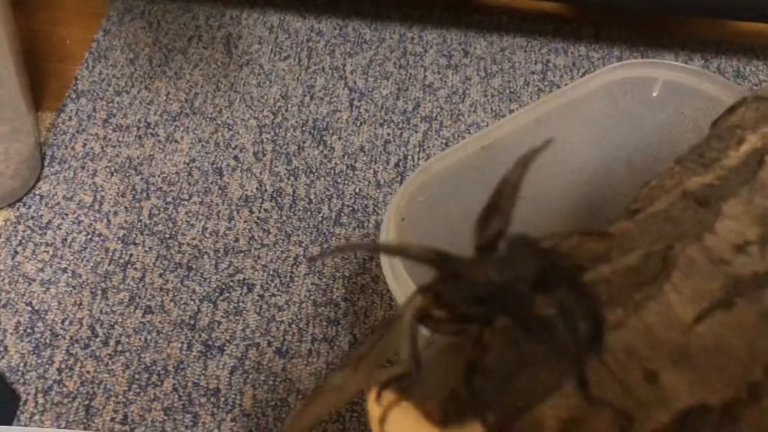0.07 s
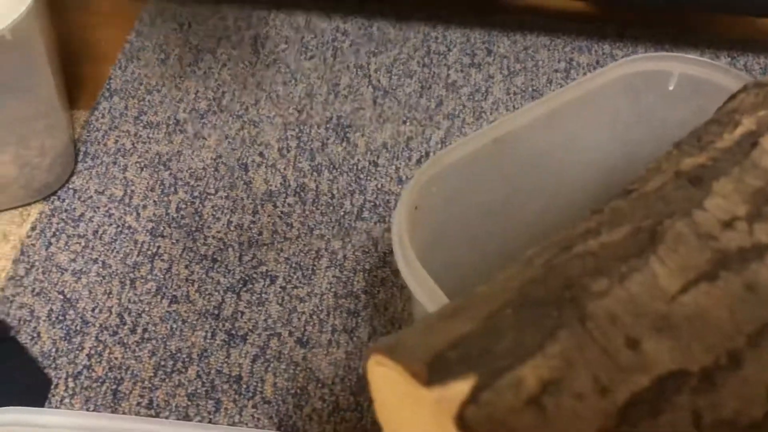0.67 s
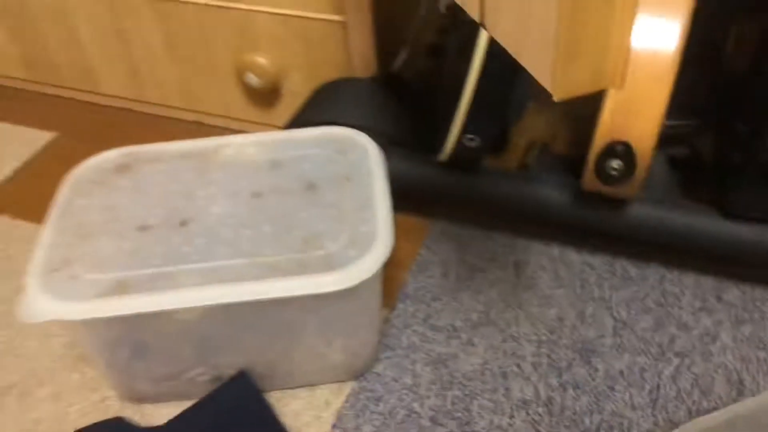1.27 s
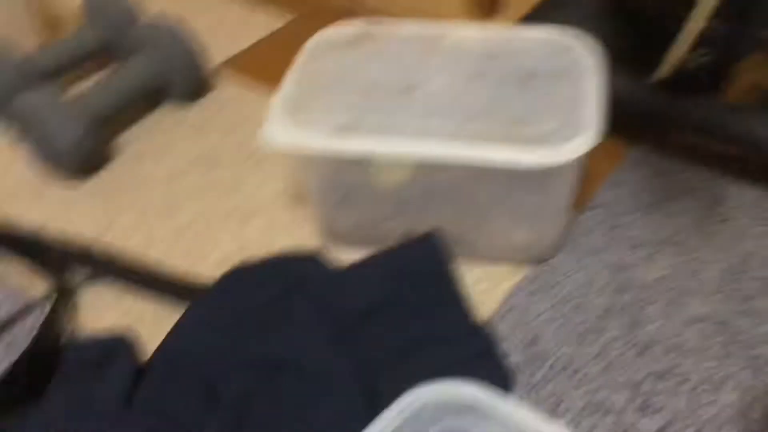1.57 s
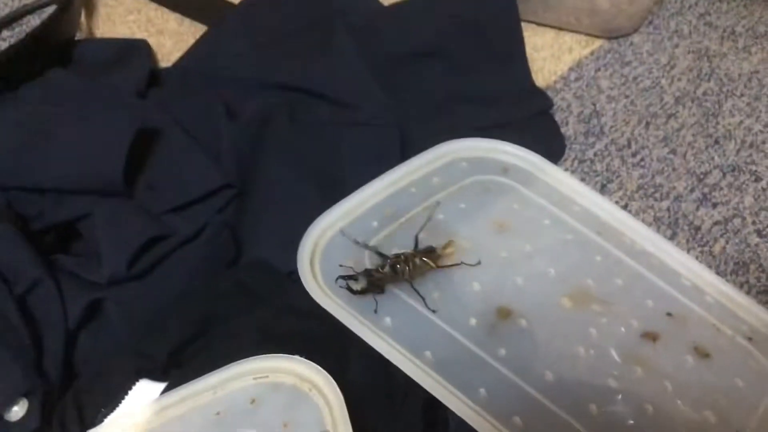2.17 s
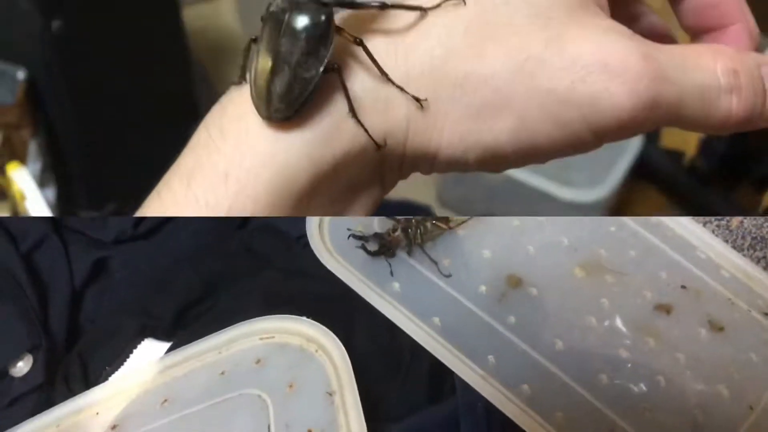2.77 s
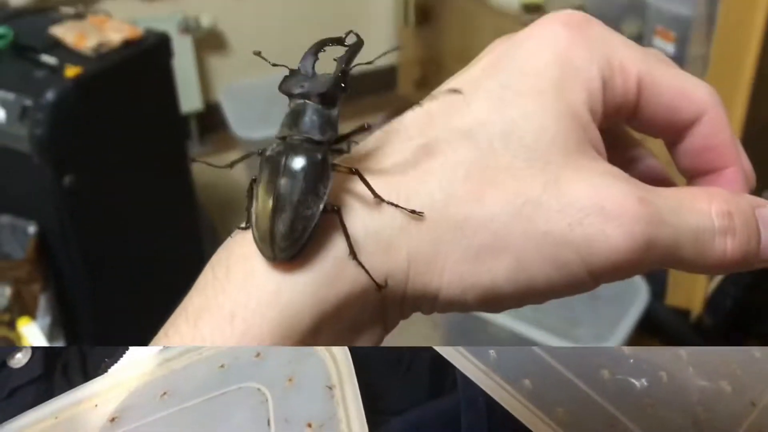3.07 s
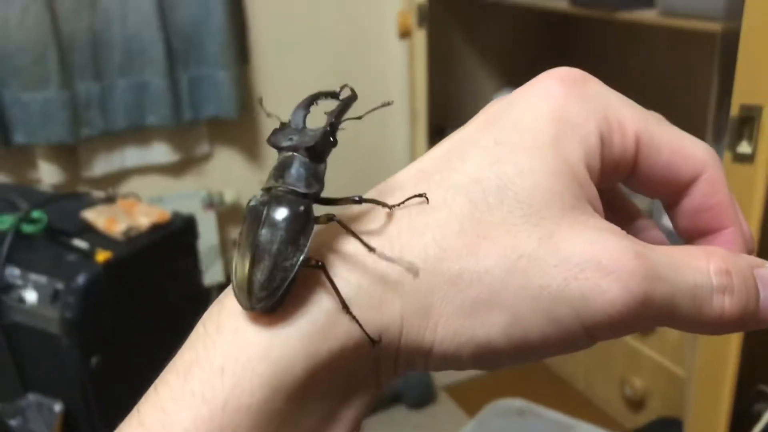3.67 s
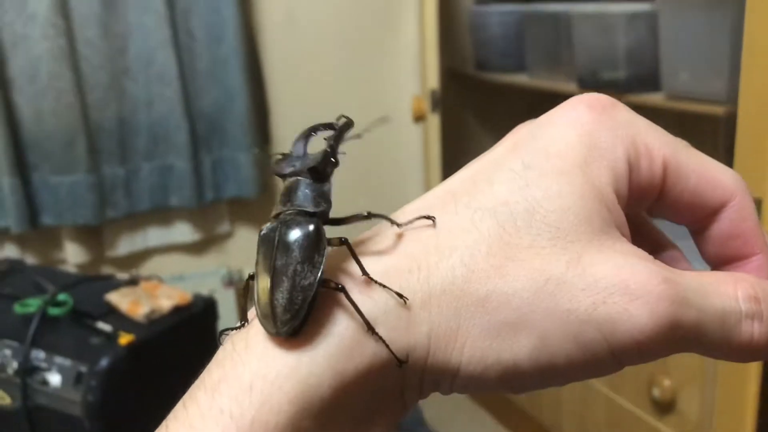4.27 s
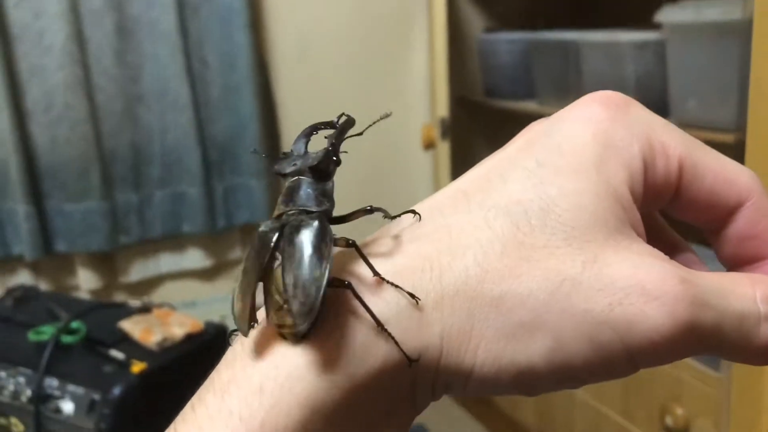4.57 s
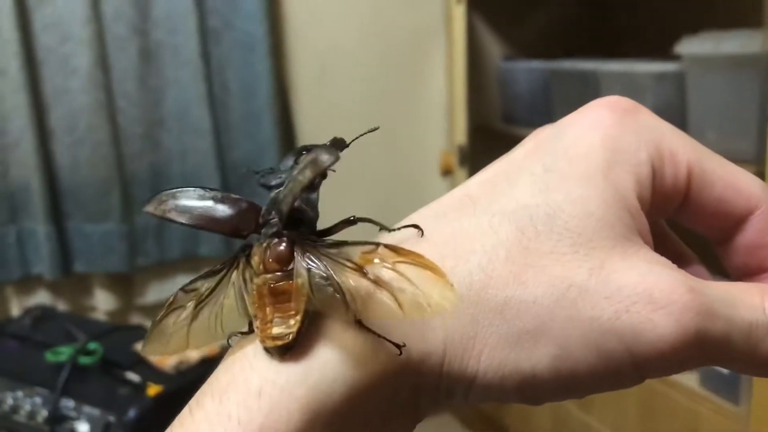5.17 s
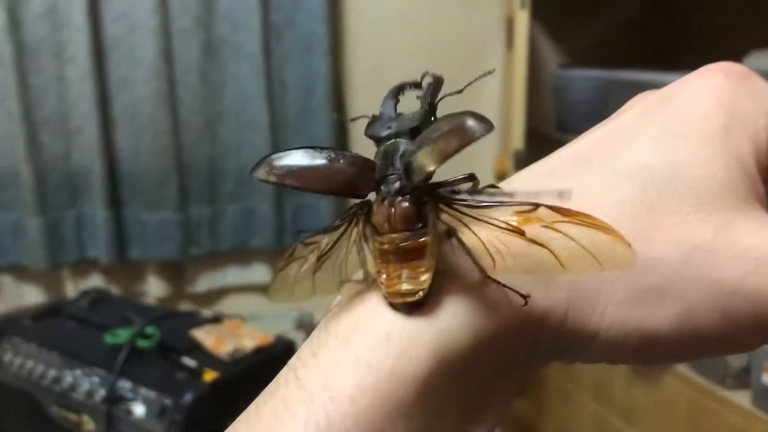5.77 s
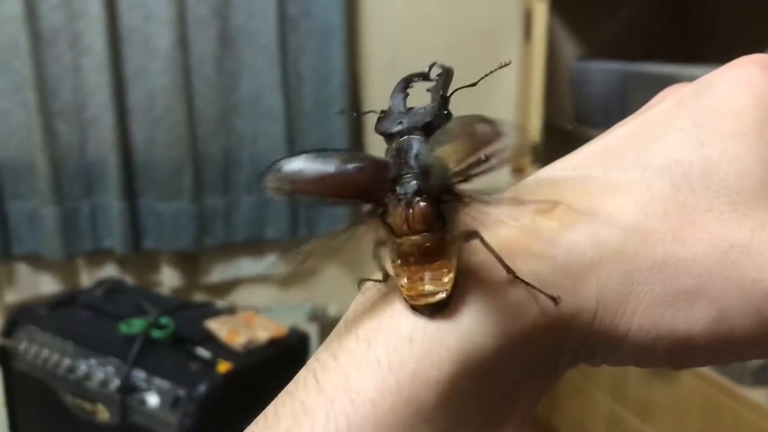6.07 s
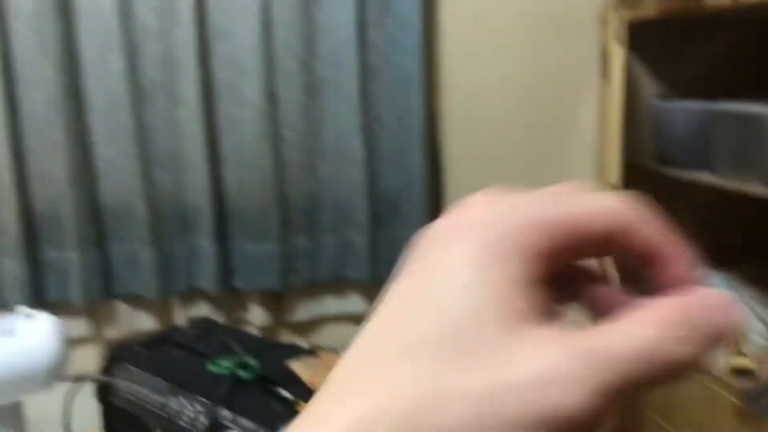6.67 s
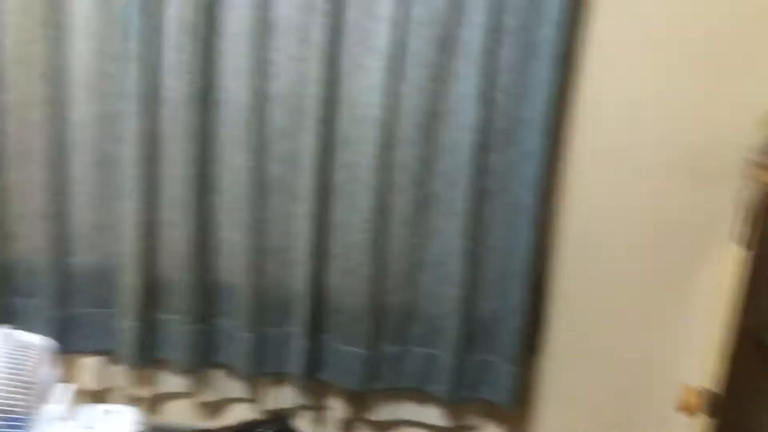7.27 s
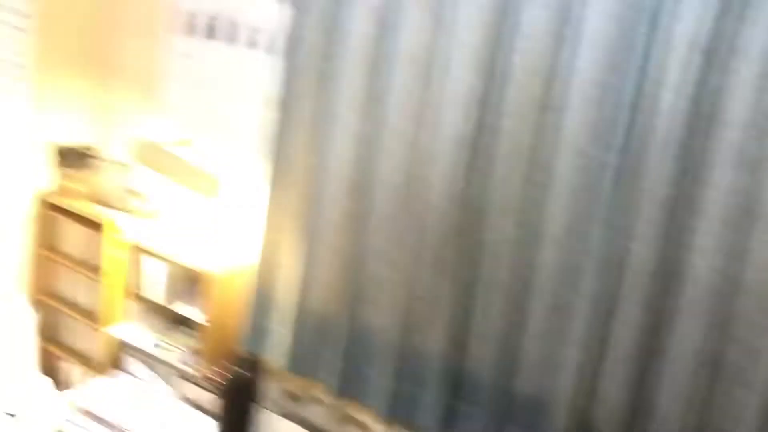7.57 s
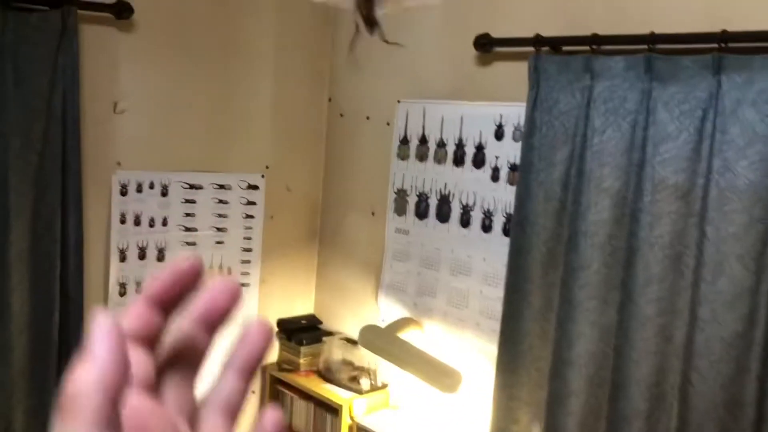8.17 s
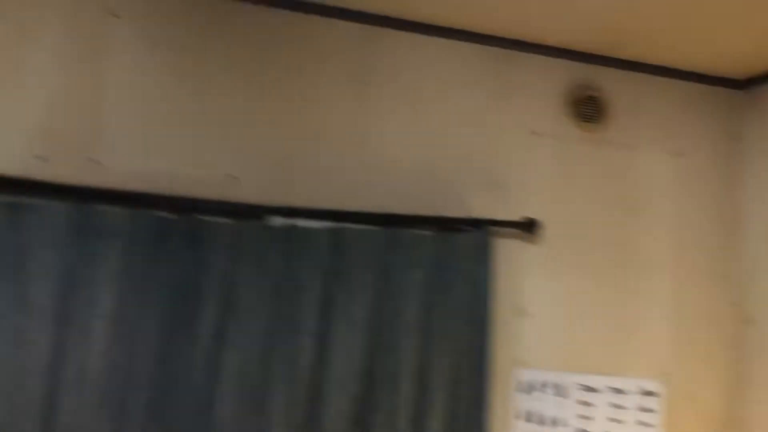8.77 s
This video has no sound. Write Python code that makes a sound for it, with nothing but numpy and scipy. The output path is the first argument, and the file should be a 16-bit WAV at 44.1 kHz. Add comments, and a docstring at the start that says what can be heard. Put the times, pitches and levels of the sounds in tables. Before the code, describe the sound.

A large beetle buzzes past and crashes onto a plastic tub; after a quiet pause, a second beetle flutters around the small room.

```python
"""Two stag beetles fly in a small quiet room. Each wingbeat is a low hum with two papery snaps, one a
stroke, plus churned air, hiss and downwash. The first beetle buzzes past the microphone, bumps into
something close and crashes onto a plastic tub, which rings as it bounces. The second clicks its wing
cases open, slides out its hind wings, leaves a hand and circles the room. Behind them: the handler's
rustling cloth, still air and a faint mains hum."""
import sys
import numpy as np
from scipy import signal
from scipy.fft import rfft, irfft, next_fast_len
from scipy.io import wavfile
from scipy.ndimage import uniform_filter1d, minimum_filter1d

SR = 44100
rng = np.random.default_rng(int(sys.argv[2]) if len(sys.argv) > 2 else 0)


def pcm_store(signal):
    """Save signal as 16-bit PCM."""
    levels = np.round(np.clip(np.atleast_2d(signal), -1, 1) * 32767)
    wavfile.write(sys.argv[1], SR, levels.astype(np.int16).T)


N = 388521
T = np.arange(N) / SR
NEAR_DB = -45  # reference nearness

# spectral shapes: (frequency [Hz], relative density [dB])
ROOM_AIR_SPECTRUM = [(15, -42), (25, -12.5), (49, -5.5), (70, -14.5), (82, -4), (102, -0.5), (123, -6),
                     (301, -9), (476, -13.5), (695, -17), (2160, -26.5), (8360, -30.5), (16000, -35.5)]
CLOTH_SPECTRUM = [(100, -10.5), (400, 4), (1200, 0.5), (2500, 0), (5000, -1), (9000, -11), (16000, -13)]
UNFOLD_SPECTRUM = [(500, -7), (1500, -4.5), (5000, -8.5), (9000, 0.5), (16000, -1.5)]
SHELL_SPECTRUM = [(200, -28), (900, -5), (2500, -4.5), (3800, -2), (6000, -0.5), (9500, -5.5), (12000, -6),
                  (16000, -9)]
BLOW_SPECTRUM = [(40, -58.5), (100, -39), (140, -13.5), (190, -7), (250, -11), (420, 1.5), (650, 1),
                 (820, 1.5), (1150, -3.5), (1400, -9), (2000, -4.5), (2700, -15.5), (4000, -16),
                 (8000, -16.5), (16000, -36.5)]
DOWNWASH_SPECTRUM = [(22, -35), (45, -5), (110, -2.5), (200, 2), (280, -4), (400, -17.5), (800, -36),
                     (2000, -47)]
CHURN_SPECTRUM = [(30, -20), (100, -9.5), (250, -2.5), (380, -4), (500, 1), (680, -4.5), (900, -3.5),
                  (1200, -6.5), (2000, -16.5), (4000, -38.5)]
HISS_SPECTRUM = [(600, -20), (1400, 0), (2500, -4.5), (4000, -7), (7000, -9.5), (11000, -14),
                 (16000, -14.5)]
SNAP_SPECTRUM = [(500, -31), (1200, 3.5), (2200, 2), (4000, -0.5), (7000, -3.5), (10000, -4), (13000, -7.5),
                 (16000, -11.5)]

# room decay: (frequency [Hz], t60 [s])
ROOM_DECAY = [(80, 0.75), (250, 0.47), (1000, 0.2), (4000, 0.33), (9000, 0.27), (16000, 0.26)]
# mains hum: (frequency [Hz], level [dB])
MAINS_TONES = [(99.7, -77), (199.5, -82)]
# handler's movements: (centre [s], half length [s], level [dB])
CLOTH_MOVES = [(0.01, 0.16, -66.5), (1.0, 0.068, -86), (1.351, 0.28, -69), (1.838, 0.088, -73),
               (2.103, .07, -75.5), (2.39, 0.093, -75), (2.68, .1, -80.5), (6.645, 0.025, -56),
               (6.927, 0.19, -68.5), (7.448, 0.11, -62), (7.913, 0.11, -63.5)]
# light tap on something hard: (time [s], level [dB], frequency [Hz], t60 [s])
TAPS = [(6.913, -47, 3210, 0.027)]
# claws, wing cases, wing tips: (time [s], level [dB], tilt [dB/octave], resonance [Hz])
SHELL_CLICKS = [(0.893, -25.5, -1.5, 5470), (1.124, -50, 4, 7200), (1.168, -15, -.5, 3940),
                (1.2696, -33, -1.5, 6300), (1.4129, -40, -1.5, 6140), (1.987, -56, -1, 9000),
                (2.036, -55.5, -1, 8100), (2.428, -60.5, -4.5, 8830), (3.577, -62.5, 5, 9540),
                (4.32, -42.5, 5.5, 9100), (4.56, -48, 5.5, 9230), (6.1188, -40, 6, 10500),
                (6.2755, -45, 2, 2500), (6.332, -43, -5.5, 2400), (6.9154, -49.5, 2, 3250),
                (7.6403, -46, -5, 5500), (7.696, -41.5, 4, 6960)]
# wings and legs on bark, plastic or skin: (time [s], level [dB], decay [s], tilt [dB/octave])
SHELL_SCRAPES = [(0.252, -56, 0.0052, -3.5), (0.39, -39, 0.0044, 0.5), (0.398, -37, 0.0026, -2.5),
                 (0.4177, -30, 0.0026, 3), (0.8813, -29, 0.0028, -2.5), (0.9025, -26, .0021, -0.5),
                 (0.94, -39, 0.0055, -4.5), (0.9755, -42, .005, 3), (1.017, -49.5, .003, 6),
                 (1.036, -49.5, .004, -0.5), (1.155, -36.5, 0.0032, -0.5), (1.161, -32.5, 0.0027, 1),
                 (2.122, -57, 0.0016, -6.5), (4.668, -58, 0.0045, -6), (6.086, -38.5, .0025, -5)]
# blows on plastic: (time [s], level [dB], treble shelf [dB])
BLOWS = [(0.886, -20, -31), (0.911, -33.5, -9), (1.1637, -32.5, -11), (1.168, -16.5, -6.5),
         (1.227, -40.5, 0), (1.263, -32.5, 4.5), (1.412, -52.5, -8), (1.433, -38, -2), (1.486, -45.5, -19),
         (1.521, -55, -22.5), (1.579, -58.5, -22), (2.603, -56.5, -10.5), (3.204, -58, -13)]
# tub modes: (frequency [Hz], relative level [dB], t60 [s])
TUB_RING = [(184, -6, 0.33), (413, -12, 0.067), (497, -9, 0.19), (645, -10, .12), (770, -7, .12),
            (1000, -3.5, .1), (1055, -9, 0.17), (1650, -13, .08), (1840, -13, 0.034)]

# a row per flight: (lift-off [s], first full downstroke [s], end [s])
FLIGHT_TIMES = [(0.396, 0.42, 1.0), (6.085, 6.111, 9)]
# pass over the microphone, a row per flight: (time [s], approach [s], extra downwash [dB])
PASSES = [(0.91, .03, 14), (6.37, 0.16, 5.5)]
# wingbeat, a curve per flight: (time [s], rate [Hz])
BEAT_RATES = [
    [(0.48, 36.71), (0.54, 36.3), (0.63, 35.0), (0.8, 35.57)],
    [(6.2, 36.11), (6.37, 35.43), (6.59, 36.02), (6.9, 34.92), (7.13, 34.55), (7.67, 35.61), (7.98, 34.15),
     (8.16, 34.98)],
]
# path, a curve per flight: (time [s], nearness as hum level [dB], downstroke facing the microphone [dB])
FLIGHT_PATHS = [
    [(0.41, -44.5, 3), (0.56, -44, 6.5), (0.62, -40, -4), (0.7, -40.5, -7), (0.82, -34.5, -4.5),
     (0.875, -27.5, -1), (0.95, -43.5, 6), (0.99, -86, 14)],
    [(6.09, -45, -10.5), (6.17, -44.5, -0.5), (6.28, -47, 6), (6.46, -47, 3.5), (6.6, -49, 1.5),
     (6.82, -60, -16), (7.1, -57, -3), (7.28, -61, 5.5), (7.43, -61.5, 3), (7.56, -48.5, 3),
     (7.68, -49.5, 6.5), (7.87, -59, 8), (8.02, -56, 5.5), (8.15, -56.5, -1.5), (8.32, -57, 11.5),
     (8.43, -52, -0.5), (8.81, -55.5, 4.5)],
]
# hum, a table per flight: (wingbeat multiple, relative level [dB])
HUM_PARTIALS = [
    [(1, -21.5), (2, -4.5), (3, -10.5), (4, 1.5), (5, -8), (6, -7), (7, -11.5), (8, -21), (9, -16.5),
     (10, -18.5), (11, -23), (12, -19.5)],
    [(1, -16), (2, 2), (3, -5.5), (4, 0), (5, -8.5), (6, -5), (7, -8.5), (8, -16.5), (9, -33), (10, -22),
     (11, -21), (12, -23)],
]
# brief fades of the hum: (centre [s], half length [s], gain [dB])
HUM_FADES = [(7.298, .08, -3), (8.175, 0.086, -8)]


def amp(db):
    """Decibels to gain."""
    return 10 ** (np.asarray(db) / 20)


def unit_rms(x):
    """Scales to rms 1."""
    return x / np.sqrt(np.mean(x ** 2) + 1e-20)


def unit_peak(x):
    """Scales the loudest 2 ms to rms 1."""
    return x / np.sqrt(uniform_filter1d(np.pad(x, 88) ** 2, 88).max())


def at_hz(points, hz):
    """Interpolates a table over log frequency."""
    points_hz, values = np.transpose(points)
    return np.interp(np.log(hz + 1), np.log(points_hz + 1), values)


def curves(rows):
    """Interpolates each column over time."""
    times_s, *columns = np.transpose(rows)
    return [np.interp(T, times_s, column) for column in columns]


def swell(centre_s, half_s):
    """Gaussian bump of height 1."""
    return np.exp(-((T - centre_s) / half_s) ** 2)


def wander(rate_hz):
    """Random drift, rate_hz new values a second."""
    return np.interp(T * rate_hz, np.arange(4000), rng.standard_normal(4000))


def noise(spectrum):
    """Shaped noise of rms 1."""
    size = next_fast_len(N)
    gain = amp(at_hz(spectrum, np.fft.rfftfreq(size, 1 / SR)))
    return unit_rms(irfft(rfft(rng.standard_normal(size)) * gain, size)[:N])


def minimum_phase(gain_db):
    """Frequency response with a sharp onset for a gain curve."""
    log_gain = np.log(amp(np.r_[gain_db, gain_db[-2:0:-1]]))
    return np.exp(np.conj(signal.hilbert(log_gain)))[:len(gain_db)]


def add(mix, start_s, sound):
    """Mixes a sound in at start_s."""
    part = mix[round(start_s * SR):][:len(sound)]
    part += sound[:len(part)]


def background(air_db=-68.5, dip_db=-3.5):
    """Still room air and mains hum; the level dips once, briefly."""
    mains = 0
    for hz, db in MAINS_TONES:
        gain = amp(db + wander(3.1)) * np.sqrt(2)
        mains += gain * np.sin(2 * np.pi * hz * T + 0.33 * wander(1.5))
    return amp(dip_db * swell(2.92, .24)) * (amp(air_db) * noise(ROOM_AIR_SPECTRUM) + mains)


def room(x, slot_samples=20, count=1100):
    """Dense reflections off near walls; each band decays at its own rate."""
    echoes = np.zeros(SR)
    signs = rng.choice([-1., 1.], count)
    echoes[np.arange(count) * slot_samples + rng.integers(0, slot_samples, count) + SR // 300] = signs
    hz, t, bands = signal.stft(echoes, SR, nperseg=256)
    early = 1 + 2.4 * np.exp(-t / .015)
    decay = amp(-60 * t / at_hz(ROOM_DECAY, hz)[:, None])
    tail = signal.istft(bands * early * decay, SR, nperseg=256)[1]
    return signal.oaconvolve(x, tail / np.linalg.norm(tail))[:N]


def cloth(grain_db=3):
    """Cloth rubs in soft clumps, one swell a movement."""
    moves = sum(amp(db) * swell(centre_s, half_s) for centre_s, half_s, db in CLOTH_MOVES)
    return moves * amp(grain_db * wander(150)) * noise(CLOTH_SPECTRUM)


def taps():
    """A tap rings one short mode."""
    out, t = np.zeros(N), np.arange(SR // 4) / SR
    for start_s, db, hz, t60_s in TAPS:
        add(out, start_s, amp(db - 60 * t / t60_s) * np.sin(2 * np.pi * hz * t))
    return out


def unfolding(start_s=4.565, lock_s=4.68, release_s=.008, first_db=-76.5, last_db=-60):
    """Hind wings slide open; the hiss grows until they lock."""
    gate = (T > start_s) * np.exp(-np.maximum(T - lock_s, 0) / release_s)
    level_db = np.interp(T, [start_s, lock_s], [first_db, last_db]) + 2 * wander(390)
    return gate * amp(level_db) * noise(UNFOLD_SPECTRUM)


def shell_contact(decay_s, tilt_db_per_oct, ring_hz, ring_db=4):
    """Hard shell catches and slips: a sharp edge if short, a gritty burst if longer."""
    hz, t = np.fft.rfftfreq(4096, 1 / SR), np.arange(4096) / SR
    decay = np.exp(-t / decay_s)
    grit = rng.standard_normal(len(t)) * amp(3 * rng.standard_normal(len(t))) * decay * (1.1 - decay)
    grit[SR // 3000] += .0015 / decay_s  # the edge
    resonance_db = ring_db / (1 + ((hz / ring_hz - 1) / 0.24) ** 2)
    tilt_db = tilt_db_per_oct * np.log2((hz + 500) / 5000)
    colour = minimum_phase(at_hz(SHELL_SPECTRUM, hz) + tilt_db + resonance_db)
    return unit_peak(irfft(rfft(grit) * colour))


def clicks_and_scrapes(click_decay_s=0.0008, scrape_ring_hz=9500):
    """Claws, legs and wings strike or brush a surface."""
    out = np.zeros(N)
    for start_s, db, tilt, ring_hz in SHELL_CLICKS:
        add(out, start_s, amp(db) * shell_contact(click_decay_s, tilt, ring_hz))
    for start_s, db, decay_s, tilt in SHELL_SCRAPES:
        add(out, start_s, amp(db) * shell_contact(decay_s, tilt, scrape_ring_hz))
    return out


def tub_knocks(dispersion_s=.0022, shelf_hz=1800, ring_rise_s=0.0032):
    """Bending waves in thin plastic: treble arrives first, then bass, then the tub rings."""
    out, hz, t = np.zeros(N), np.fft.rfftfreq(4096, 1 / SR), np.arange(SR // 3) / SR
    delay_s = dispersion_s * np.maximum(np.sqrt(800 / (hz + 150)) - .35, 0)
    dispersion = np.exp(-2j * np.pi * np.cumsum(delay_s) * hz[1])
    shelf = hz ** 2 / (hz ** 2 + shelf_hz ** 2)
    fade = np.cos(np.linspace(0, np.pi / 2, 4096)) ** 2
    for start_s, db, treble_db in BLOWS:
        blow = fade * irfft(minimum_phase(at_hz(BLOW_SPECTRUM, hz) + treble_db * shelf) * dispersion)
        ring = sum(amp(mode_db - 60 * t / t60_s) * np.sin(2 * np.pi * (mode_hz * t + rng.random()))
                   for mode_hz, mode_db, t60_s in TUB_RING)
        ring *= 1 - np.exp(-t / ring_rise_s)
        ring_db = -35.5 + 0.63 * db  # grows less than the blow
        add(out, start_s, amp(db) * unit_peak(blow))
        add(out, start_s, amp(ring_db) * unit_peak(ring))
    return out


def stroke_bursts(beats, at_beats, width_beats, scatter_db):
    """Envelope of one burst a beat, uneven in strength and length."""
    index = np.floor(beats - at_beats + .5)
    strength, length = rng.standard_normal((1024, 2))[index.astype(int) % 1024].T
    offset = (beats - at_beats - index) / (width_beats * np.exp(0.21 * length))
    shape = np.where(offset < 0, np.exp(-offset ** 2), np.exp(-abs(offset) ** 1.2))
    return amp(scatter_db * strength) * shape


def wing_hum(beats, partials, upstroke_beats):
    """Wingbeat partials, rms 1; each stroke sets off a short low swing of the air."""
    out = 0
    for k, db in partials:
        strokes_rad = np.angle(1 + np.exp(-2j * np.pi * k * upstroke_beats))
        swing_rad = np.arctan(2.5 * (k / 4.3 - 4.3 / k)) + .25 * k
        gain = amp(db + 1.8 * wander(6))  # moving through the room's standing waves
        out += gain * np.sin(2 * np.pi * k * beats + strokes_rad - swing_rad + .2 * wander(7))
    return unit_rms(out)


def flight(timing, passing, rates, path, partials, upstroke_beats=.58, lift_decay_s=0.15):
    """Wings push a hum, snap at each reversal, churn the air and blow downwards."""
    start_s, downstroke_s, stop_s = timing
    pass_s, approach_s, blast_db = passing
    near_db, facing_db = curves(path)
    closer_db = near_db - NEAR_DB
    beats = np.cumsum(curves(rates)[0]) / SR
    beats -= np.interp(downstroke_s, T, beats)
    flying = np.clip((T - start_s) / 0.0094, 0, 1) * np.clip((stop_s - T) / 0.018, 0, 1)
    lift = np.exp(-np.maximum(T - start_s, 0) / lift_decay_s)  # air stirred over the perch
    pass_width_s = approach_s * np.where(T < pass_s, 1, 3.4)  # leaves more slowly than it comes
    overhead = 1 / (1 + ((T - pass_s) / pass_width_s) ** 2)

    fades_db = sum(db * swell(centre_s, half_s) for centre_s, half_s, db in HUM_FADES)
    upper = wing_hum(beats, partials[2:], upstroke_beats)
    bass = amp(-12 + 13.5 * overhead) * wing_hum(beats, partials[:2], upstroke_beats)  # near field
    hum = amp(near_db + fades_db) * (upper + bass)

    down = amp(facing_db) * stroke_bursts(beats, 0, width_beats=0.051, scatter_db=3.5)
    up = stroke_bursts(beats, upstroke_beats, width_beats=0.057, scatter_db=3.5)
    up *= amp(-2.5 - 0.13 * facing_db)
    snaps = amp(-48 + 0.88 * closer_db) * (down + up) * noise(SNAP_SPECTRUM)

    puffs = sum(stroke_bursts(beats, at + .02, width_beats=.06, scatter_db=1.2)
                for at in (0, upstroke_beats))
    churn = amp(-55 + 0.82 * closer_db) * unit_rms(.15 + puffs) * noise(CHURN_SPECTRUM)
    hiss = amp(-70 + 0.29 * closer_db + 10.5 * lift + wander(300)) * noise(HISS_SPECTRUM)
    gusts_db = 13.5 * lift + blast_db * overhead + 3.5 * wander(40)
    downwash = amp(-56.5 + 1.09 * closer_db + gusts_db) * noise(DOWNWASH_SPECTRUM)
    return flying * hum, flying * (snaps + churn + hiss), flying * downwash


def scene(wing_send_db=-10, hum_send_db=-19, knock_send_db=-8, click_send_db=-13):
    """Both flights, the crash and the handling sounds in the room; mono."""
    knocks, clicks = tub_knocks(), clicks_and_scrapes() + taps()
    direct = knocks + clicks
    send = amp(knock_send_db) * knocks + amp(click_send_db) * clicks
    flights = zip(FLIGHT_TIMES, PASSES, BEAT_RATES, FLIGHT_PATHS, HUM_PARTIALS)
    for timing, passing, rates, path, partials in flights:
        hum, wing_noise, downwash = flight(timing, passing, rates, path, partials)
        wetness = amp(0.2 * (NEAR_DB - curves(path)[0]))  # drier when near
        direct += hum + wing_noise + downwash
        send += wetness * (amp(wing_send_db) * wing_noise + amp(hum_send_db) * hum)
    return (direct + room(send) + cloth() + unfolding() + background())[None]


def record(dry, low_cut_hz=33, ceiling=.85, band_edge_hz=16200):
    """Microphone low cut, 2 ms peak limiter, band limit."""
    thinned = signal.sosfilt(signal.butter(4, low_cut_hz, "high", fs=SR, output="sos"), dry)
    max_gain = np.minimum(1, ceiling / (abs(thinned) + 1e-9))
    limited = thinned * uniform_filter1d(minimum_filter1d(max_gain, 89), 89)
    lowpass = signal.firwin(255, band_edge_hz, window=("kaiser", 9), fs=SR)
    return signal.oaconvolve(limited, lowpass[None], "same")


dry = scene()
out = record(dry)
pcm_store(out)
```